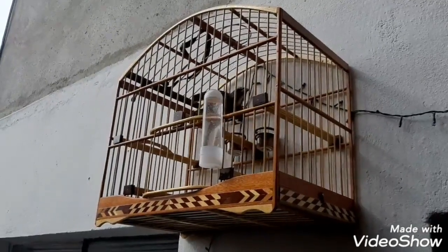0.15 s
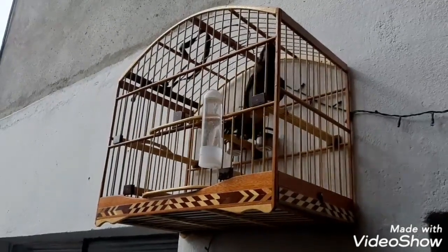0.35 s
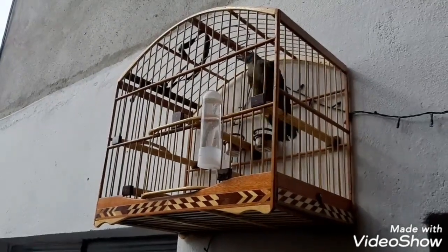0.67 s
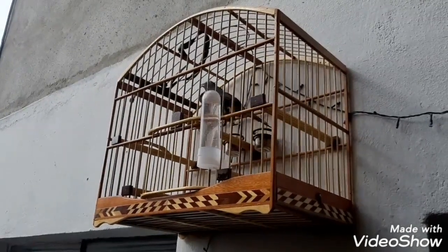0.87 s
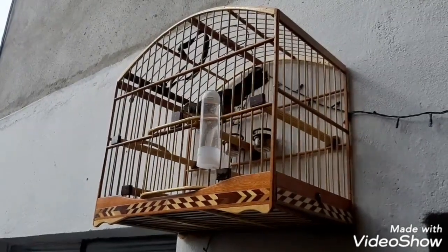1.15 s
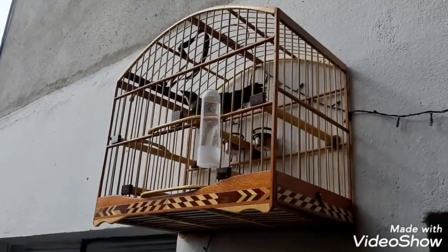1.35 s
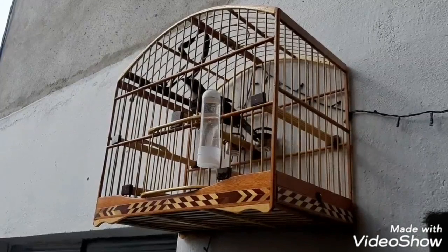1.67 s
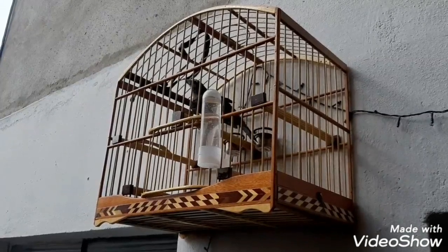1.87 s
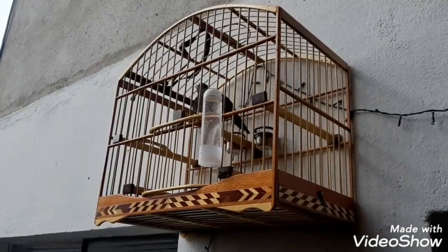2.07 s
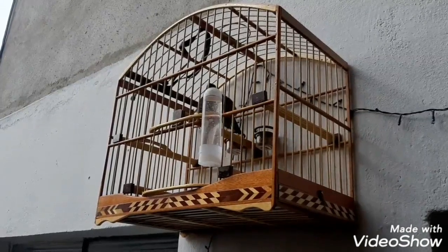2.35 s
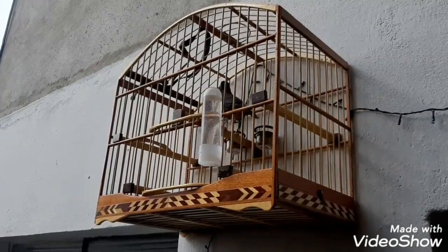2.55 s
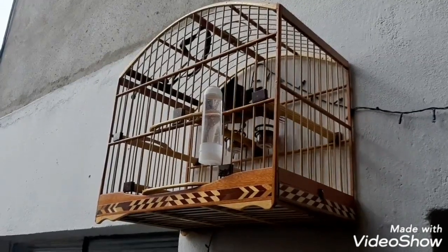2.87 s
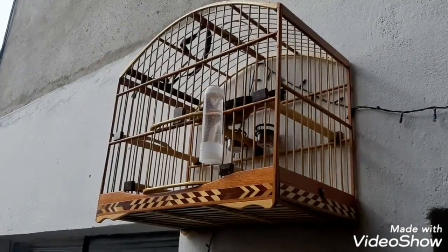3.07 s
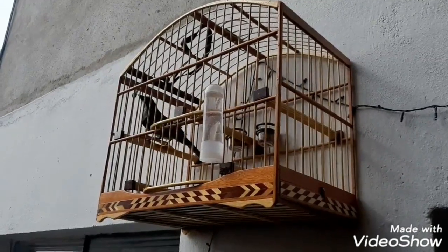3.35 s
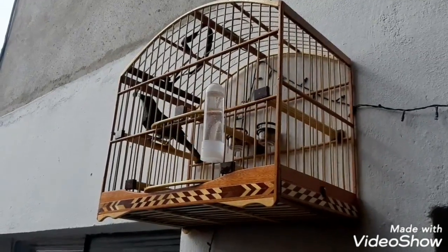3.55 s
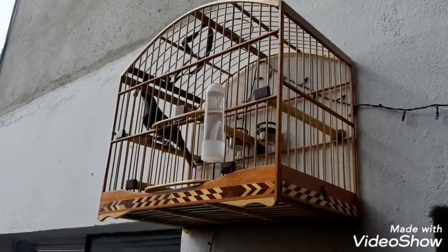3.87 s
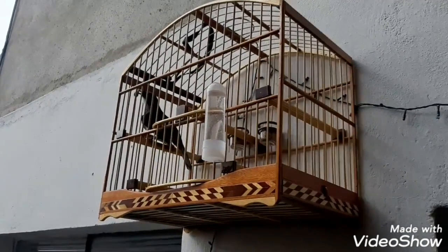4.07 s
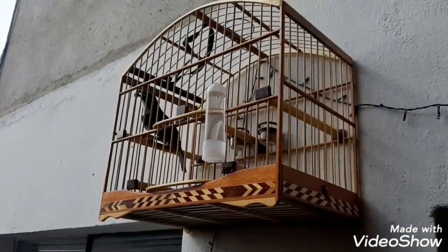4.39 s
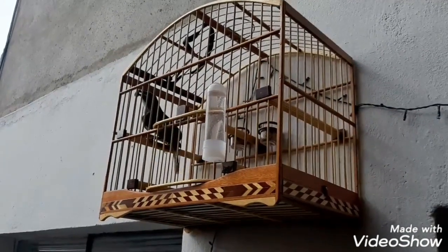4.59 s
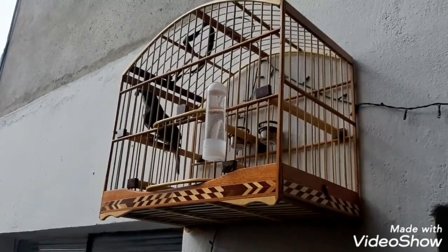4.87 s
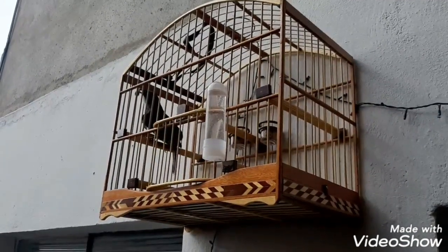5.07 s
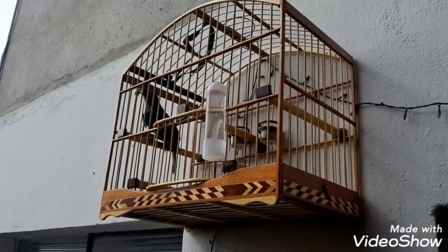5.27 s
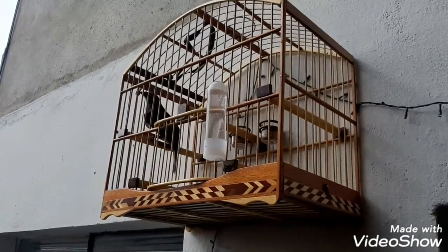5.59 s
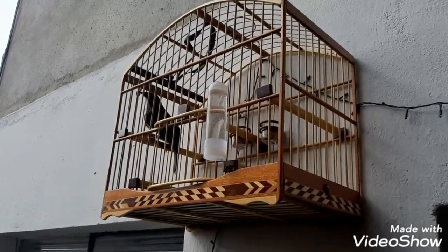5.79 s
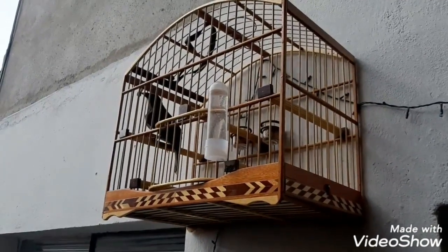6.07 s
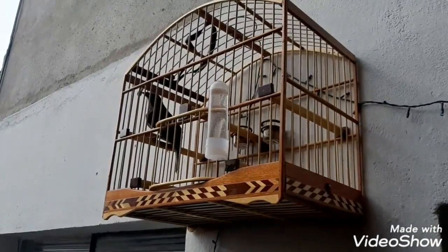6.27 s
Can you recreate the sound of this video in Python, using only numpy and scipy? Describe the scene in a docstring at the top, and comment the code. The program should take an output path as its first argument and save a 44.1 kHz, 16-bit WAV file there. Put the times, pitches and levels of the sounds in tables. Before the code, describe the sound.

Over a quiet outdoor rumble, wings flick and claws tick, a far bird chirps faintly, then a close bird whistles four falls and a rise.

```python
"""A walled yard in town: rumble and the hum of a distant motor, steady noise and wavering sines, run on.
Close by, a songbird in a wooden cage on the house wall hops about: noise puffs for wings, ringing modes
for claws and wood. A far bird gives a thin scooped call and three chirps, mostly as echo. Then the caged
bird sings four falling whistles, the first two with a buzzy trill early on, and a long rising one:
gliding sines with hoarse overtones and a trace of air, echoed by the yard."""
import sys
import numpy as np
from scipy import signal
from scipy.fft import rfft, irfft
from scipy.io import wavfile
from scipy.ndimage import uniform_filter1d

SR = 44100
rng = np.random.default_rng(int(sys.argv[2]) if len(sys.argv) > 2 else 0)


def log_audio(samples):
    """Write samples as a 16-bit WAV file to the path given in sys.argv[1]."""
    # one column per channel
    frames = np.atleast_2d(samples).T
    # limit to full scale, then quantise
    limited = np.clip(frames, -1, 1)
    pcm = np.round(limited * 32767).astype(np.int16)
    wavfile.write(sys.argv[1], SR, pcm)


N = 283563
TIME = np.arange(N) / SR
ATTACK_S, RELEASE_S = 0.037, 0.024  # of every whistle and of the far call


def from_db(db):
    """Decibels to amplitude gain."""
    return 10 ** (np.asarray(db) / 20)


def rms_one(x):
    """Scale to unit rms."""
    return x / np.sqrt(np.mean(x ** 2) + 1e-20)


def at_hz(points, hz, axis=1):
    """Read one column of a table along log frequency."""
    points = np.array(sorted(points))
    return np.interp(np.log(hz), np.log(points[:, 0]), points[:, axis])


def drift(rate_hz):
    """Smooth random wander of spread 1: noise through two equal low-pass poles, drawn every 40 samples."""
    step, settle = 40, 2000
    r = np.exp(-2 * np.pi * rate_hz * step / SR)
    raw = rng.standard_normal(N // step + 2 + settle)
    slow = signal.lfilter([1], [1, -2 * r, r * r], raw)[settle:]
    return np.interp(np.arange(N) / step, np.arange(len(slow)), rms_one(slow))


def noise(spectrum, likeness=None):
    """Stereo noise of a given colour, rms 1; the mid-side balance sets how alike the channels are."""
    hz = np.maximum(np.fft.rfftfreq(N, 1 / SR), 1)
    alike = np.clip(at_hz(likeness, hz), -1, 1) if likeness else 0
    mid, side = rfft(rng.standard_normal((2, N))) * from_db(at_hz(spectrum, hz))
    left_right = np.sqrt(1 + alike) * mid + np.sqrt(1 - alike) * side * [[1], [-1]]
    return rms_one(irfft(left_right, N))


def yard(x, t60, dull_hz=4500, onset_s=0.015):
    """Diffuse, dull reverberation between the house walls: decaying noise, different at each microphone."""
    t = TIME[:SR]
    tail = rng.standard_normal((2, SR)) * from_db(-60 * t / t60) * (1 - np.exp(-(t / onset_s) ** 2))
    tail /= np.sqrt(np.sum(tail ** 2, axis=1, keepdims=True))
    tail = signal.sosfilt(signal.butter(2, dull_hz, fs=SR, output="sos"), tail)
    return signal.fftconvolve(x[None], tail, axes=1)[:, :N]


def town(waver_db=1.1, wander=0.003):
    """Steady rumble with a distant motor's unsteady hum, sines on one wandering speed."""
    # rumble colour: f/Hz, relative level/dB
    rumble_colour = [(18, -32), (40, -10), (110, -1), (190, 0), (400, -3), (560, -6.5), (1000, -9),
                     (1550, -9.5), (2000, -14.5), (3000, -21.5), (5000, -27.5), (7500, -35), (8500, -62),
                     (15000, -85)]
    # left-right likeness of the rumble: f/Hz, likeness (0-1)
    rumble_likeness = [(40, .95), (190, .96), (400, .85), (560, .53), (1050, .1), (1500, .35), (2100, .1),
                       (8000, 0)]
    # motor hum: f/Hz, level/dB
    motor_lines = [(41, -69), (82, -49), (88.7, -56), (143, -61.5), (163.8, -51), (205, -59.5),
                   (322, -59.5), (410, -57.5)]
    rumble_db, left_lag_s = -42.5, 0.0003
    speed = 1 + wander * drift(1.2)
    turns = 2 * np.pi * np.cumsum(speed) / SR
    hum = 0
    for hz, db in motor_lines:
        level = np.sqrt(2) * from_db(db + waver_db * drift(5))
        hum = hum + level * np.sin(hz * turns + rng.uniform(0, 2 * np.pi))
    left, right = hum + from_db(rumble_db) * noise(rumble_colour, rumble_likeness)
    # it reaches the right microphone first, and is slightly stronger at the left
    left = np.pad(left, (round(left_lag_s * SR), 0), mode="edge")[:N]
    return np.array([left, right]) * from_db([[0.65], [-0.65]])


def puffs(rows):
    """Amplitude of short, smooth bursts, each bell-shaped in time."""
    return sum(from_db(db) * np.exp(-((TIME - s) / half) ** 2) for s, db, half in rows)


def strike(hits, modes, scatter_db=-2.5):
    """Each hit rings every mode, a decaying two-pole resonance, with a strength of its own."""
    at = [round(s * SR) for s, db in hits]
    hit_db = np.array(hits)[:, 1]
    out = np.zeros(N)
    for hz, mode_db, t60 in modes:
        clicks = np.zeros(N)
        clicks[at] = from_db(hit_db + mode_db + scatter_db * rng.standard_normal(len(at)))
        r = from_db(-60 / (t60 * SR))
        w = 2 * np.pi * hz / SR
        out += signal.lfilter([0, np.sin(w)], [1, -2 * r * np.cos(w), r * r], clicks + 1e-18)
    return out


def hops(claw_hz=6500):
    """Wings flick as noise puffs; claws ring bars and frame, their highest treble softened."""
    # wing flicks: t/s, level/dB, half length/s
    flicks = [(.075, -53, 0.021), (0.38, -56, 0.043), (0.5, -53, 0.024), (0.87, -53, 0.028),
              (0.976, -52, 0.021), (3.008, -61, .025), (3.23, -60, 0.026), (3.389, -48.5, 0.018)]
    # feather swish: f/Hz, relative level/dB
    feather_colour = [(1000, -7), (2500, 9.5), (4000, 5), (7300, 4.5), (9000, -19), (13000, -7),
                      (16000, -30)]
    # feet on perch and bars: t/s, level/dB
    foot_taps = [(.372, -43.5), (.485, -46), (.498, -44), (.856, -50), (.888, -55), (2.594, -43),
                 (3.271, -49), (3.379, -42)]
    # modes of the thin cage bars: f/Hz, relative level/dB, t60/s
    bar_modes = [(3740, -4.5, 0.036), (4150, -2, 0.018), (4720, -11, 0.041), (6800, -8, 0.025)]
    # light knock on the wooden frame: t/s, level/dB
    frame_knocks = [(2.685, -40.5)]
    # modes of the wooden frame: f/Hz, relative level/dB, t60/s
    frame_modes = [(745, 1, 0.054), (1040, -3, .07)]
    hits = strike(foot_taps, bar_modes) + strike(frame_knocks, frame_modes)
    taps = signal.sosfilt(signal.butter(4, claw_hz, fs=SR, output="sos"), hits)
    wings = puffs(flicks) * from_db(2.0 * drift(150)) * noise(feather_colour)
    return taps + from_db(-4) * yard(taps, 0.15) + wings


def gate(start, length):
    """Amplitude of a note: rounded attack, hold, rounded release."""
    attack = np.clip((TIME - start) / ATTACK_S, 0, 1)
    release = np.clip((start + length - TIME) / RELEASE_S, 0, 1)
    return np.sin(np.pi / 2 * attack * release) ** 2


def far_call():
    """Pitch and amplitude of the thin call, which scoops up exponentially and fades as it levels off."""
    start_s, length_s, scoop_s = 1.065, 0.34, 0.06
    from_hz, to_hz = 2300, 4000
    call_db, fade_db = -51, -19
    age = np.clip(TIME - start_s, 0, length_s)
    pitch = to_hz + (from_hz - to_hz) * np.exp(-age / scoop_s)
    return pitch, gate(start_s, length_s) * from_db(call_db + fade_db * np.sqrt(age / length_s))


def far_chirp(top_s, db):
    """Pitch and amplitude of one chirp: an arch in pitch with a soft tail."""
    # arch that all chirps share: t/s from the top, f/Hz, relative level/dB
    arch = [(-.02, 2994, -4), (0, 3750, -7), (.016, 3294, 1.5), (.028, 2880, -1), (.036, 3060, -9),
            (.06, 3010, -8)]
    s, hz, shape_db = np.transpose(arch)
    level = np.interp(TIME - top_s, s, from_db(db + shape_db), left=0, right=0)
    return np.interp(TIME - top_s, s, hz), uniform_filter1d(level, size=200)


def far_bird(waver=0.023, flutter_db=3.5, direct_db=-1):
    """Wavering sines for a thin rising call and three chirps; from afar, more echo than direct sound."""
    # chirps: t/s at the top of the arch, level/dB
    chirp_tops = [(1.470, -47.5), (1.573, -50.5), (1.683, -50.5)]
    echo_s, echo_db, wet_db = 0.0127, -5, 2.5
    calls = np.zeros(N)
    for pitch, level in [far_call()] + [far_chirp(s, db) for s, db in chirp_tops]:
        phase = 2 * np.pi * np.cumsum(pitch * (1 + waver * drift(85))) / SR
        calls += level * from_db(flutter_db * drift(40)) * np.sin(phase)
    echo = from_db(echo_db) * np.interp(TIME - echo_s, TIME, calls)
    diffuse = from_db(wet_db) * yard(calls, 0.2, dull_hz=6000, onset_s=0.005)
    return from_db(direct_db) * calls + echo + diffuse


def fall(start, length, from_hz, to_hz, steep_start, steep_end, db, swell_db):
    """Pitch and amplitude of a falling whistle: a smooth glide whose loudness follows its pitch."""
    # how strongly the falling voice carries: f/Hz, relative level/dB
    carrying = [(1700, -5.5), (1980, -0.5), (2330, -4), (2800, -1), (3300, -3)]
    dwell_s, waver_share, wavers_per_fall = 0.015, 0.009, 1.7
    # it dwells on its top pitch, then wavers slightly on its way down
    part = np.clip((TIME - start - dwell_s) / (length - dwell_s), 0, 1)
    bend = (steep_start - 1) * (1 - part) - (steep_end - 1) * part
    way = part + part * (1 - part) * bend
    waver = 1 + waver_share * np.cos(2 * np.pi * wavers_per_fall * part)
    pitch = from_hz * (to_hz / from_hz) ** way * waver
    return pitch, gate(start, length) * from_db(db + swell_db * (part - 0.5) + at_hz(carrying, pitch))


def trill():
    """A fast pitch swing in Hz that widens and slows, then stops."""
    # trills: start t/s, end t/s, width that the swing grows towards f/Hz
    buzzes = [(3.602, 3.663, 188.5), (3.917, 3.992, 190.6)]
    start_rate_hz, slowing = 137.4, 0.34  # the rate loses this share by the end
    swing = np.zeros(N)
    for start, end, width_hz in buzzes:
        part = np.clip((TIME - start) / (end - start), 0, 1)
        cycles = start_rate_hz * (end - start) * (part - slowing * part ** 2 / 2)
        stop = np.clip((1 - part) / 0.087, 0, 1)
        swing += width_hz * np.sqrt(part) * stop * np.sin(2 * np.pi * cycles)
    return swing


def rise():
    """Pitch and amplitude of the long whistle: it climbs ever faster to a ceiling, swells, then sags."""
    start_s, length_s = 4.885, 0.473
    from_hz, ceiling_hz, knee_octaves = 1352.6, 2282, 0.026
    octaves_per_s, octaves_per_s2 = 1.674, 1.55
    level_db, swell_s, swell_power, sag_db_per_s = -2.5, 0.35, 1.395, 25.5
    age = np.clip(TIME - start_s, 0, length_s)
    climbed = octaves_per_s * age + octaves_per_s2 * age ** 2 / 2
    octaves_left = np.log2(ceiling_hz / from_hz) - climbed
    # a soft knee rounds the arrival at the ceiling
    pitch = ceiling_hz / 2 ** (knee_octaves * np.logaddexp(0, octaves_left / knee_octaves))
    swell = np.minimum(age / swell_s, 1) ** swell_power
    sag_db = sag_db_per_s * np.maximum(age - swell_s, 0)
    hold = gate(start_s - ATTACK_S, length_s + ATTACK_S)
    return pitch, hold * swell * from_db(level_db - sag_db)


def partial(phase, hz):
    """One sine of rms 1; the wall's reflection colours it differently at each microphone."""
    # wall colour: f/Hz, left-right level/dB, left lead/rad
    wall_colour = [(1450, 3.5, 0.1), (1770, -7.5, 1.1), (1830, -0.5, 1.6), (2000, -4.5, 0),
                   (2115, -8.5, -1.4), (2110, 0.5, 0.2), (2410, 11.5, 0.9), (2900, 19, 3.3),
                   (2800, 5, -0.8), (3050, 1.5, 1.05), (3500, 0.5, 2), (5200, 4, 1.5), (9000, -0.5, 1.87),
                   (12000, 2, 1.56)]
    tilt = from_db(uniform_filter1d(at_hz(wall_colour, hz), size=260))
    lead = uniform_filter1d(at_hz(wall_colour, hz, axis=2), size=260)
    pair = np.array([tilt * np.sin(phase + lead / 2), np.sin(phase - lead / 2)])
    return pair * 2 / np.sqrt(1 + tilt ** 2)


def overtones(level, pitch, phase, whistle, flicker_db=3.0, growth=0.92, roughen_hz=380):
    """Weak multiples of the pitch; hoarseness smears them, the higher ones most, into narrow noise bands."""
    # overtones: multiple of the pitch, relative level/dB
    multiples = [(2, -38), (3, -46.5), (4, -46), (5, -41), (6, -45.5), (7, -45.5), (8, -46), (9, -53.5)]
    # voicing of each whistle: overtone level/dB, high beak resonance level/dB
    voicing = [(-3, 1.5), (1.5, 1.5), (0, 0), (-2.5, 20.5), (0.5, 1.5)]
    # colour that the throat gives the overtones: f/Hz, relative level/dB
    throat_colour = [(2900, 15.5), (3700, -11.5), (4600, 4), (5900, -7), (7000, 8.5), (8000, -1), (9000, 7),
                     (10200, -0.5), (12000, -1.5), (13000, -3.5), (14000, -1), (15800, -7.5)]
    # hoarseness of each whistle (0-1), in full from the fifth multiple up
    hoarseness = [.42, .4, .42, .18, .11]
    beak_hz, beak_width_hz = 11950, 750  # a high resonance of the open beak
    voice_db, beak_db = np.array(voicing)[whistle].T
    smear = signal.butter(2, roughen_hz, fs=SR, output="sos")
    out = 0
    for k, db in multiples:
        hz = k * pitch
        beak = beak_db / (1 + ((hz - beak_hz) / beak_width_hz) ** 2)
        flicker = flicker_db * drift(30)[:len(hz)]
        gain = from_db(db + voice_db + beak + at_hz(throat_colour, hz) + flicker)
        below_limit = np.clip((SR / 2 - hz) / 2000, 0, 1)  # fade out towards half the sample rate
        a, b = rms_one(signal.sosfilt(smear, rng.standard_normal((2, len(hz)))))
        hoarse = np.clip(hoarseness, 0, 1)[whistle] * min(k / 5, 1)
        shake = np.sqrt(1 - hoarse) + np.sqrt(hoarse / 2) * (a + 1j * b)
        out = out + gain * below_limit * np.abs(shake) * partial(k * phase + np.angle(shake), hz)
    return level ** growth * out


def songbird(jitter=0.0033, air_db=-58, overtone_wet_db=-9, late_db=-35):
    """A nearly pure gliding whistle with hoarse overtones and a trace of air, echoed by the yard."""
    # falling whistles: start t/s, length/s, from f/Hz, to f/Hz (both before the waver), steepness at
    # start and at end (multiples of the mean), level/dB, swell/dB
    falls = [ (3.591, 0.25, 2814, 1713, .56, 0.81, -11.5, 5.5),
             (3.910, 0.25, 2823, 1679, .68, 0.91, -5.5, 1), (4.232, 0.22, 3240, 1703, 2.025, .87, -4, -3.5),
             (4.528, 0.24, 3310, 2152, 0.84, 1.6, -1.5, -1)]
    # moments when the voice turns raspy: t/s, level/dB, half length/s
    raspy_moments = [(3.78, -47.5, .04), (3.96, -55, 0.035), (4.10, -44, 0.05), (4.275, -54.5, .02),
                     (4.44, -47.5, .008), (5.28, -50.5, 0.023), (5.335, -46, 0.011)]
    # rasp of the air in the whistle: f/Hz, relative level/dB
    rasp_colour = [(1500, -33), (3500, 0), (5000, -8.5), (6500, -2), (9000, -5.5), (10200, 1.5),
                   (12200, 11), (14200, -4.5), (15500, -13), (17000, -25)]
    # echoes off nearby walls: delay/s, left level/dB, right level/dB
    wall_echoes = [(0.0106, -23.5, -21.5), (0.0195, -19.5, -14), (.027, -31, -26)]
    yard_t60_s, yard_db, late_t60_s = 0.29, -16.5, 1.3
    whistles = [fall(*row) for row in falls] + [rise()]
    pitches, levels = np.transpose(whistles, (1, 0, 2))
    level = np.abs(levels.sum(0))
    singing = level > 1e-5
    pitch = (pitches * levels).sum(0) / (level + 1e-12)
    pitch = ((pitch + trill()) * (1 + jitter * drift(310)))[singing]
    phase = 2 * np.pi * np.cumsum(pitch) / SR
    loudest = levels.argmax(0)[singing]
    voice = (from_db(air_db) * level + puffs(raspy_moments)) * noise(rasp_colour)
    voice[:, singing] += overtones(level[singing], pitch, phase, loudest)
    # air and overtones get a short, bright reverberation of their own
    voice += from_db(overtone_wet_db) * yard(voice[0], 0.05, dull_hz=14000, onset_s=0.0094)
    voice[:, singing] += level[singing] * partial(phase, pitch)
    source = np.zeros(N)
    source[singing] = np.sqrt(2) * level[singing] * np.sin(phase)
    # the whistle comes back off the nearby walls and beats with its own glide
    for delay, left_db, right_db in wall_echoes:
        voice += from_db([[left_db], [right_db]]) * np.interp(TIME - delay, TIME, source)
    early = from_db(yard_db) * yard(source, yard_t60_s)
    late = from_db(late_db) * yard(source, late_t60_s)
    return voice + early + late


def scene():
    """The bird and its cage over the sounds of the neighbourhood."""
    return town() + hops() + far_bird() + songbird()


def record(dry):
    """Gain control steps down while the sound is loud and stays down; peaks clip and the top is cut."""
    cutoff_hz = 15700
    power = uniform_filter1d(np.mean(dry ** 2, axis=0), size=900)
    loud_s = np.cumsum(power > from_db(-12) ** 2) / SR  # loud time so far
    gain = from_db(-np.minimum(7.8 * loud_s, 5.8))  # dB per loud second, and the most it gives way in dB
    top_cut = signal.ellip(10, 0.1, 80, cutoff_hz, fs=SR, output="sos")
    return signal.sosfilt(top_cut, np.clip(dry * gain, -0.97, 0.97))


dry = scene()
out = record(dry)
log_audio(out)
```